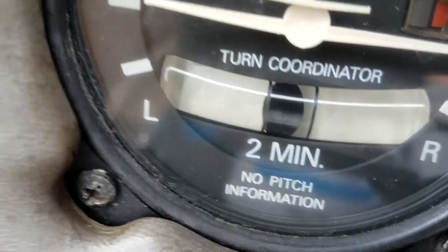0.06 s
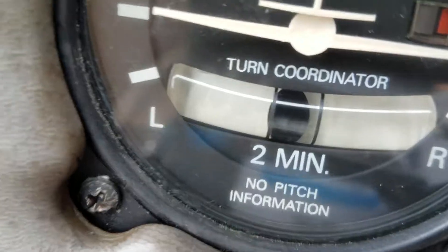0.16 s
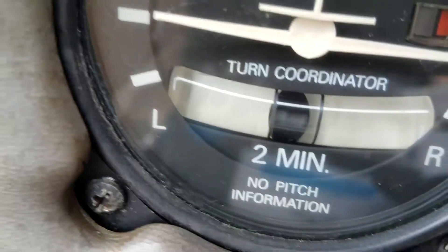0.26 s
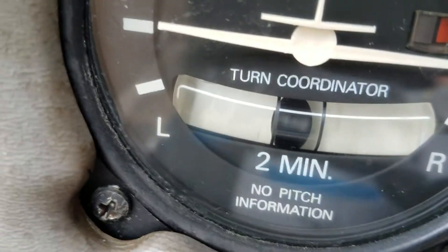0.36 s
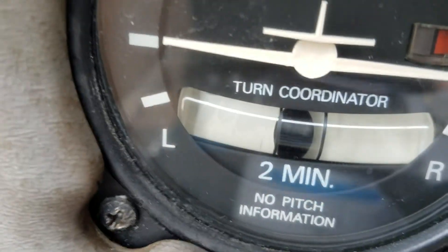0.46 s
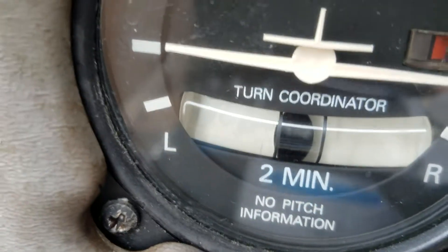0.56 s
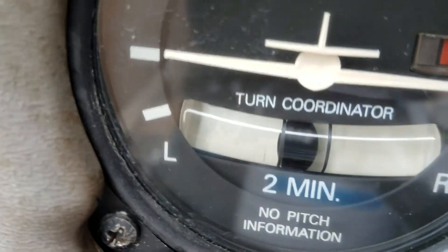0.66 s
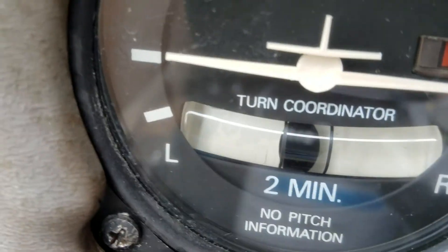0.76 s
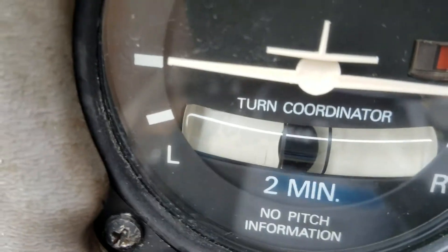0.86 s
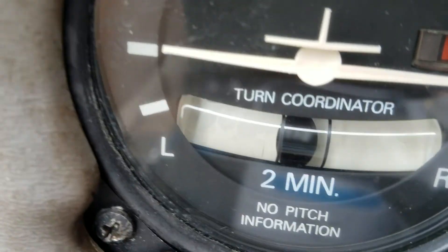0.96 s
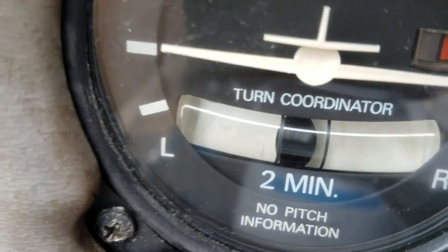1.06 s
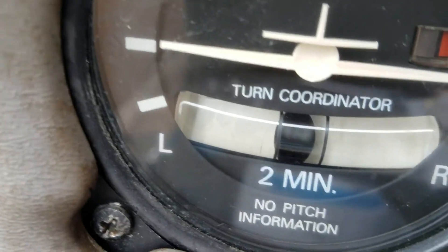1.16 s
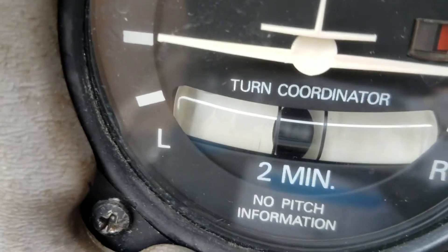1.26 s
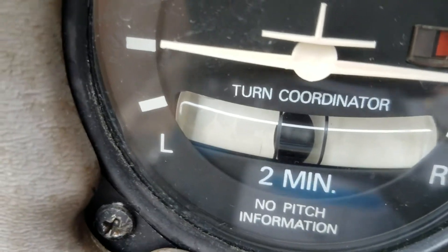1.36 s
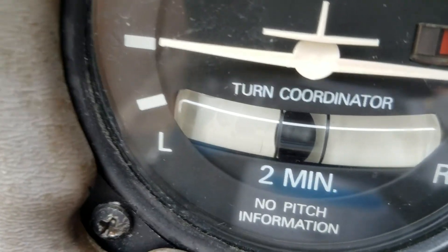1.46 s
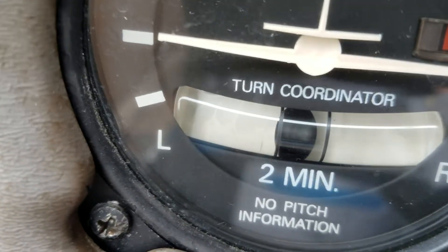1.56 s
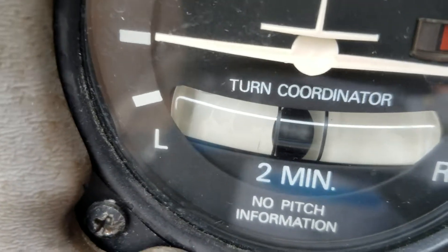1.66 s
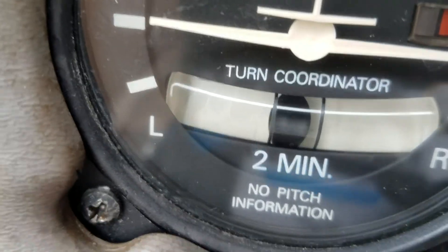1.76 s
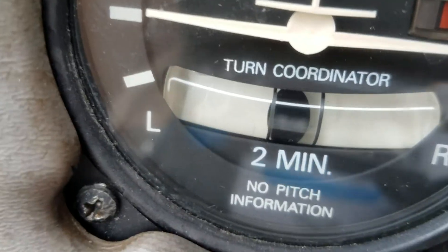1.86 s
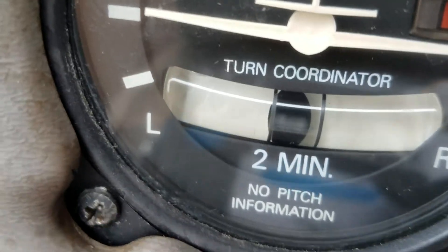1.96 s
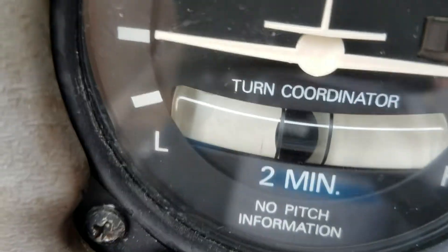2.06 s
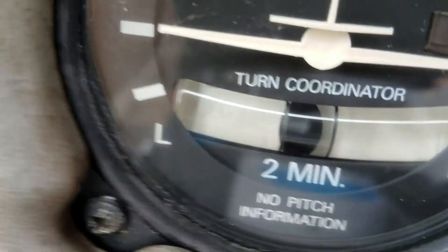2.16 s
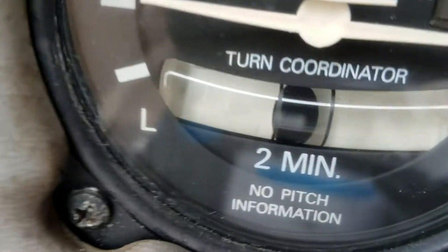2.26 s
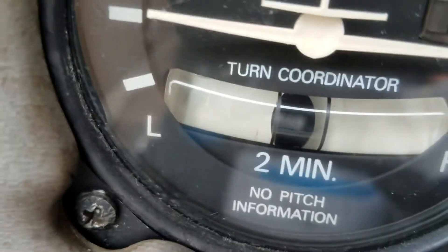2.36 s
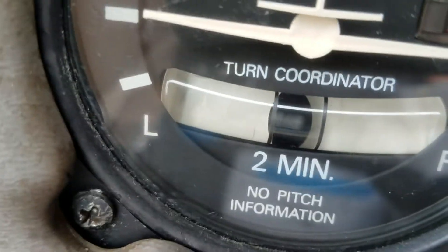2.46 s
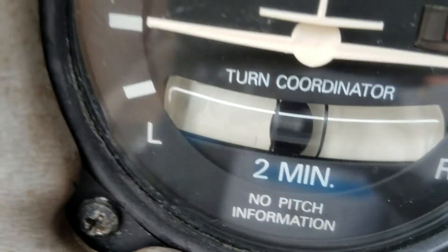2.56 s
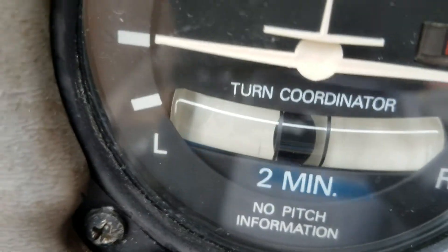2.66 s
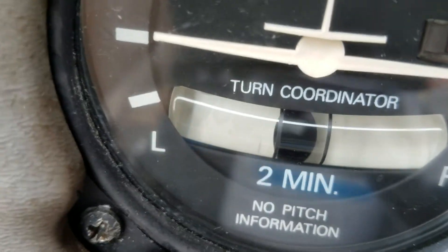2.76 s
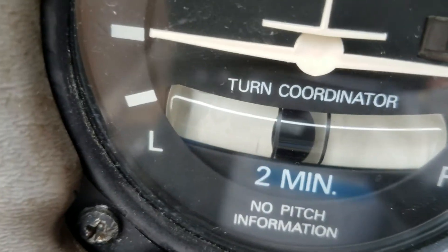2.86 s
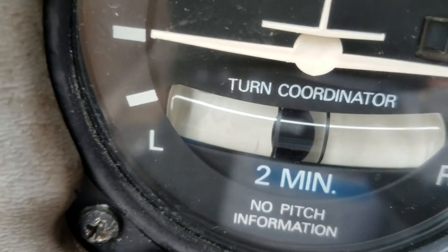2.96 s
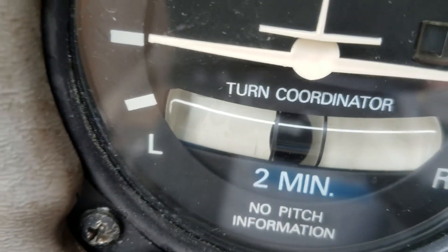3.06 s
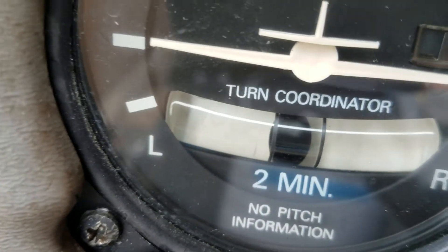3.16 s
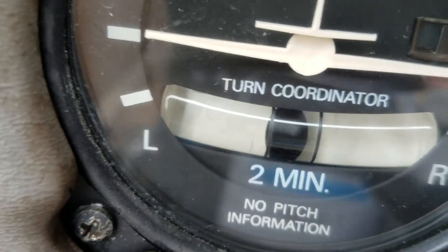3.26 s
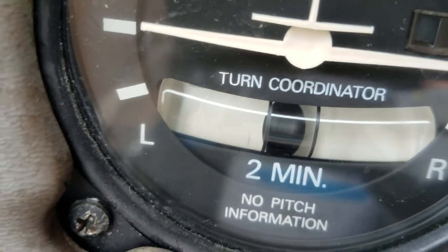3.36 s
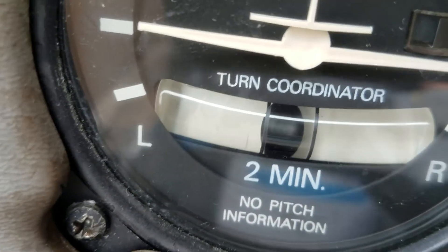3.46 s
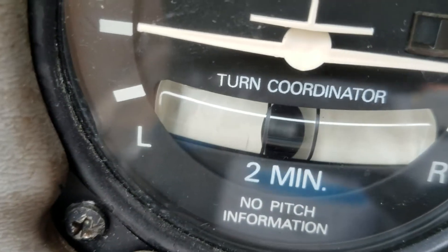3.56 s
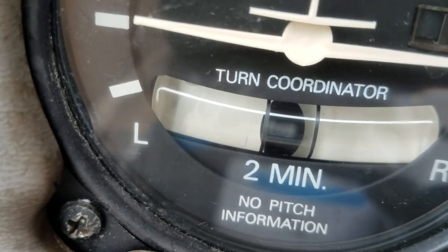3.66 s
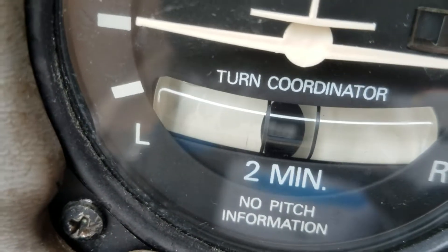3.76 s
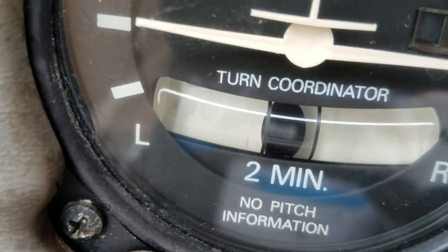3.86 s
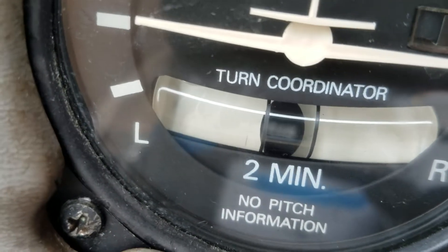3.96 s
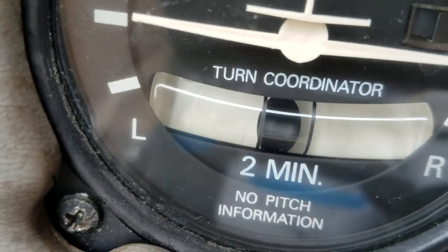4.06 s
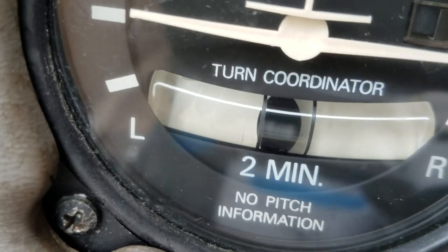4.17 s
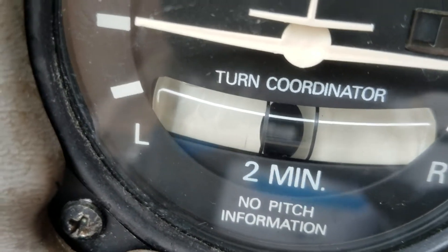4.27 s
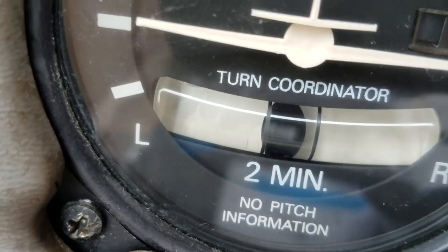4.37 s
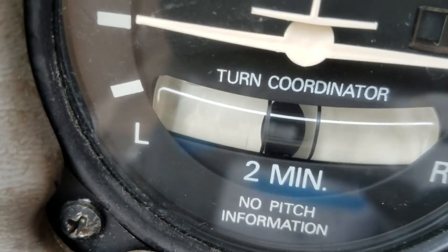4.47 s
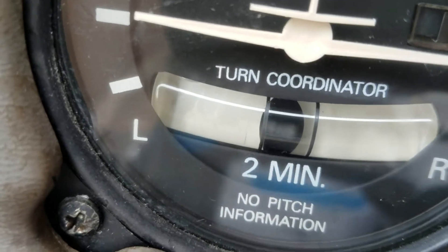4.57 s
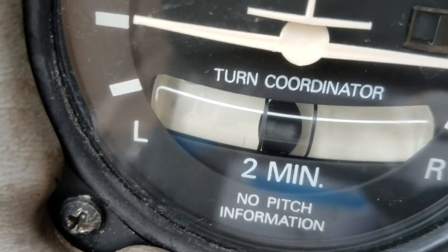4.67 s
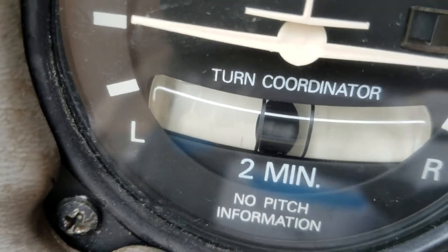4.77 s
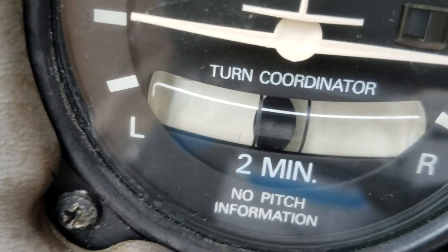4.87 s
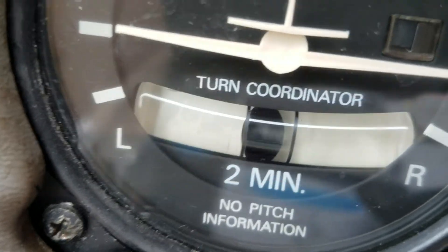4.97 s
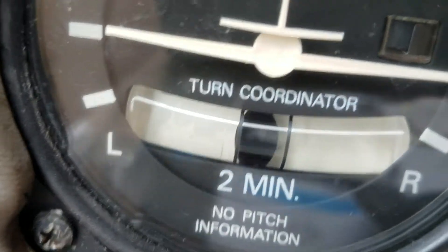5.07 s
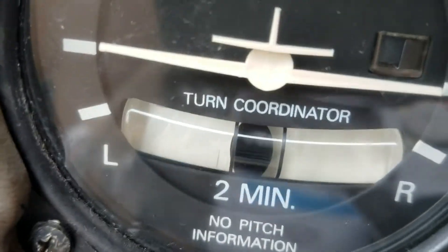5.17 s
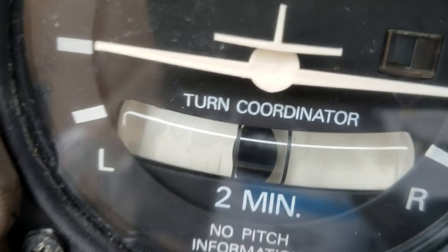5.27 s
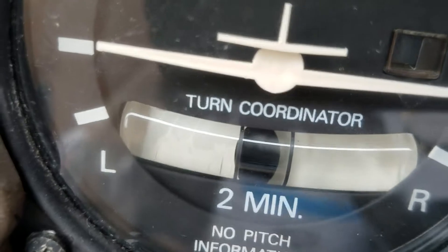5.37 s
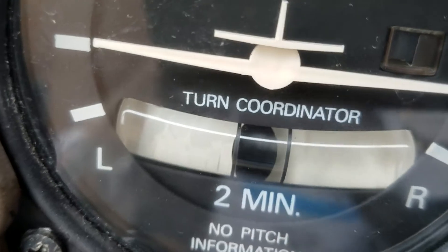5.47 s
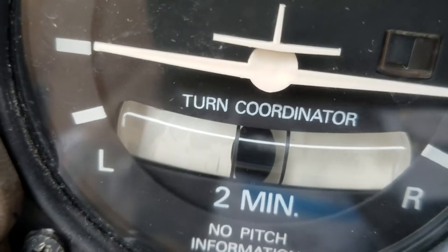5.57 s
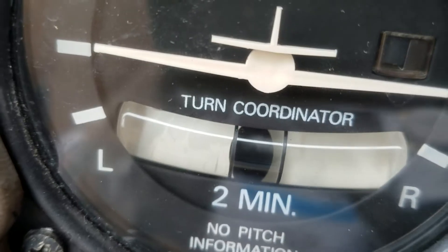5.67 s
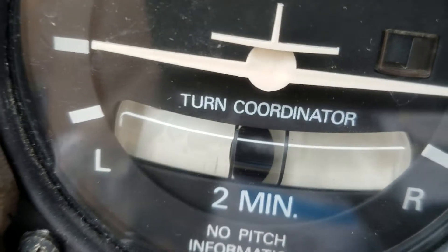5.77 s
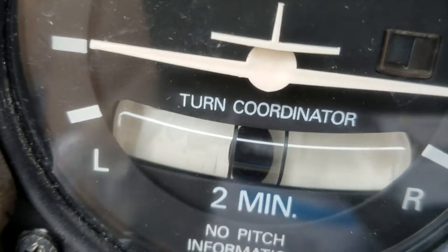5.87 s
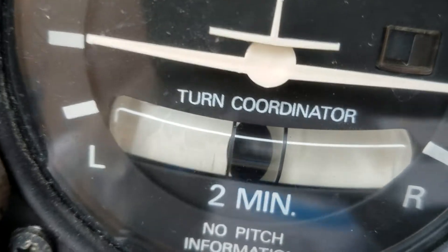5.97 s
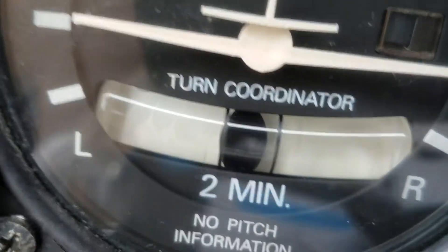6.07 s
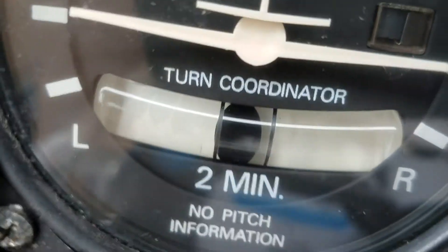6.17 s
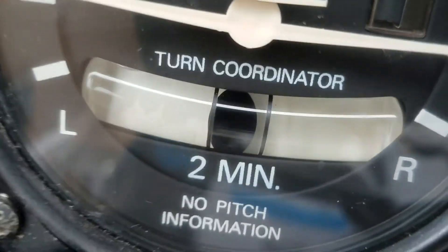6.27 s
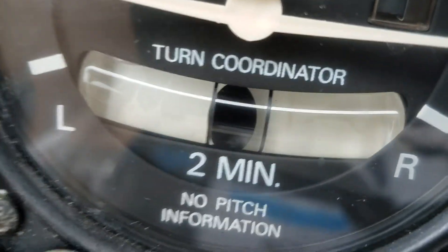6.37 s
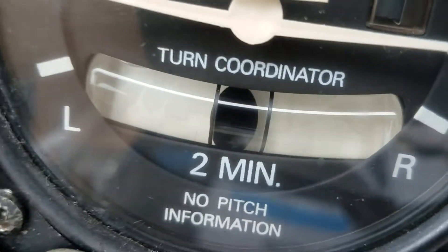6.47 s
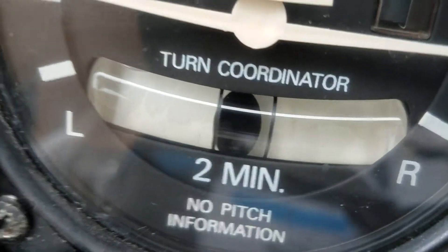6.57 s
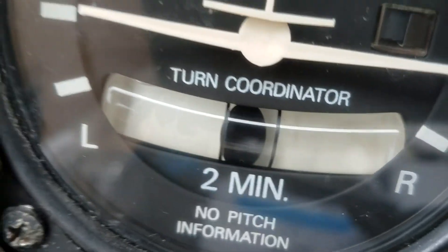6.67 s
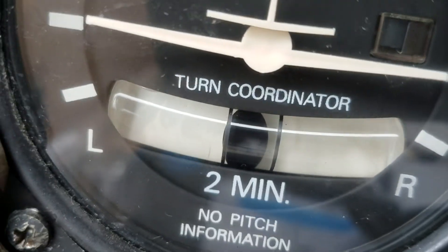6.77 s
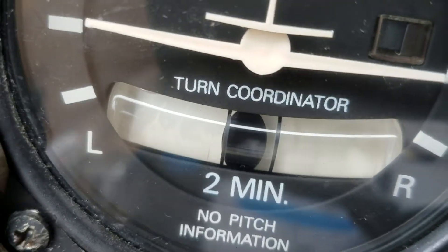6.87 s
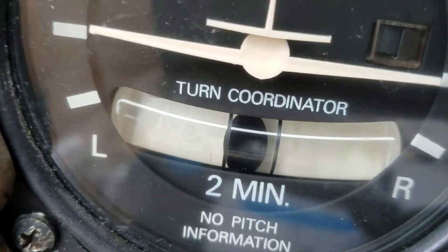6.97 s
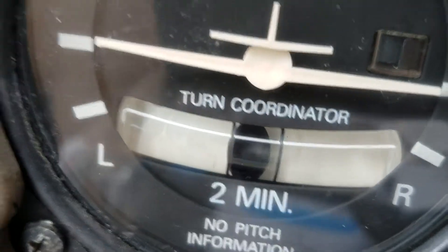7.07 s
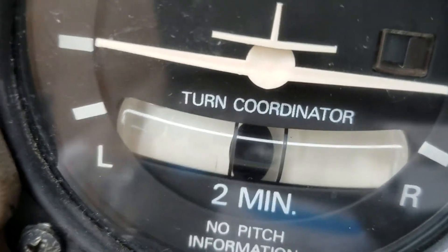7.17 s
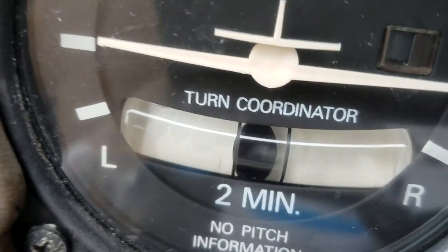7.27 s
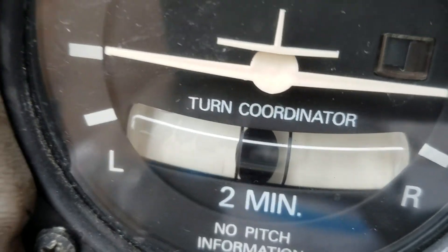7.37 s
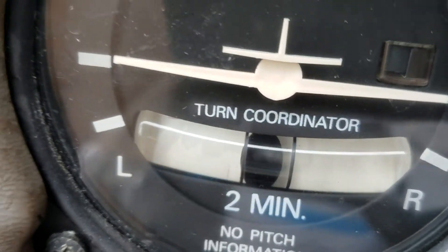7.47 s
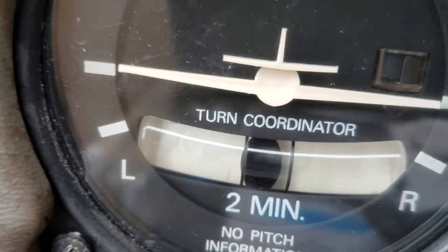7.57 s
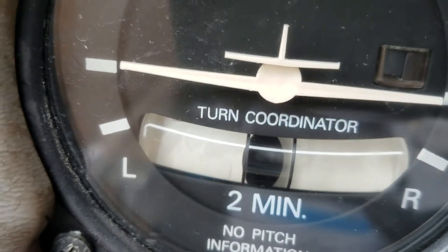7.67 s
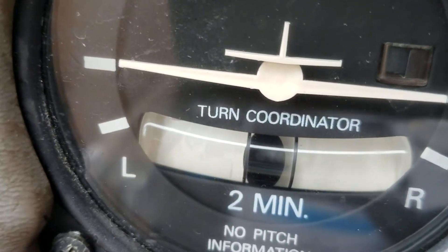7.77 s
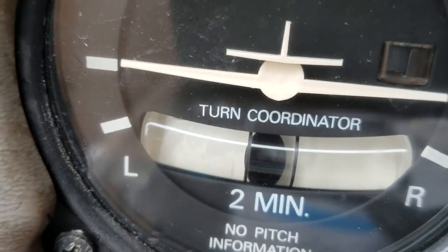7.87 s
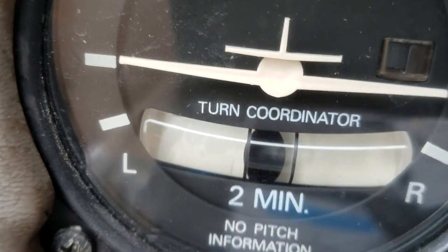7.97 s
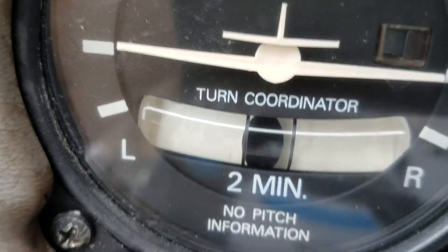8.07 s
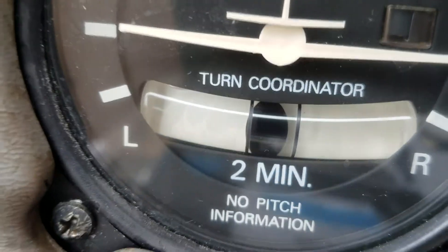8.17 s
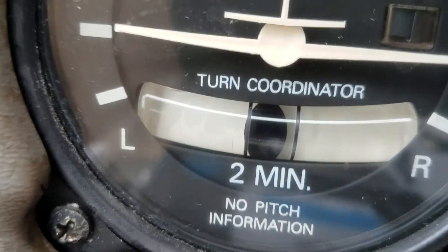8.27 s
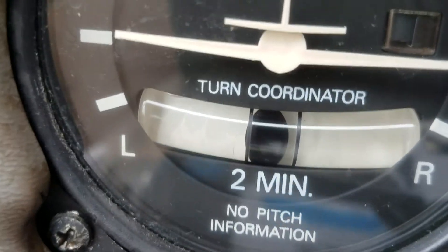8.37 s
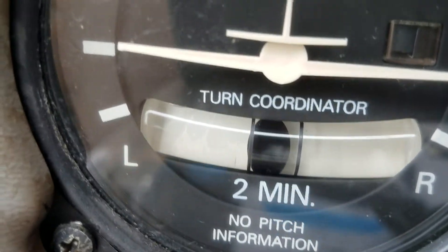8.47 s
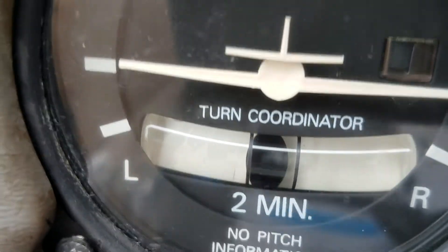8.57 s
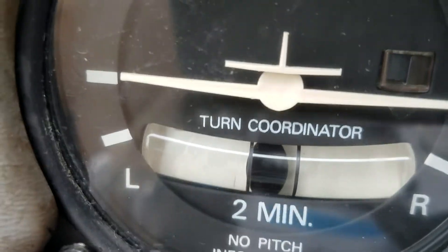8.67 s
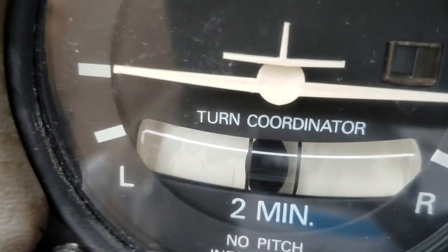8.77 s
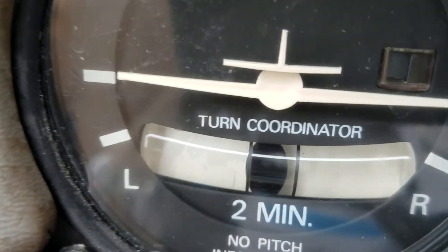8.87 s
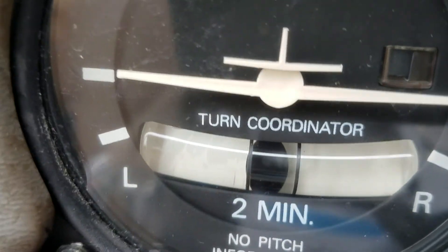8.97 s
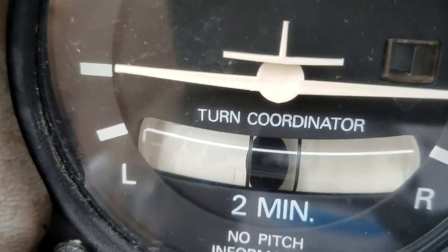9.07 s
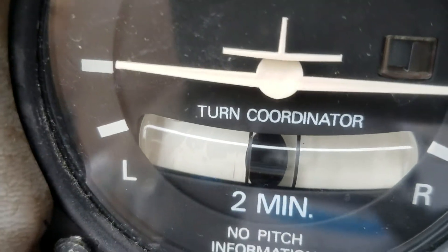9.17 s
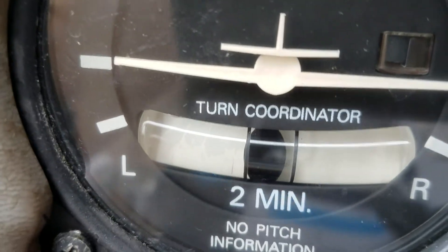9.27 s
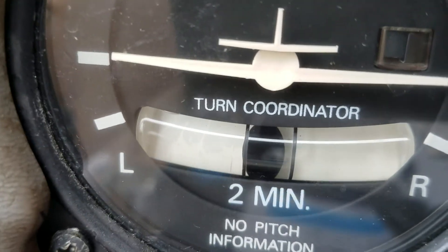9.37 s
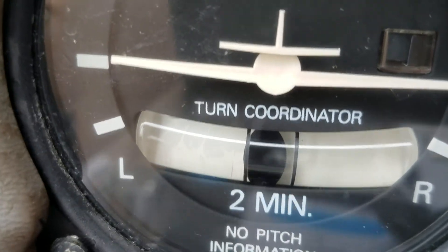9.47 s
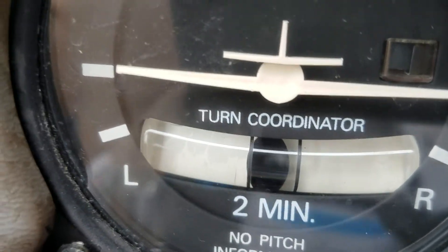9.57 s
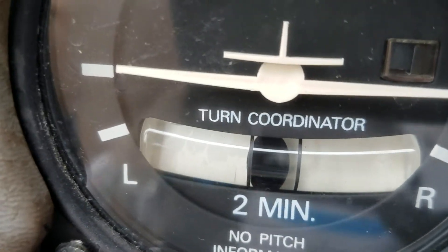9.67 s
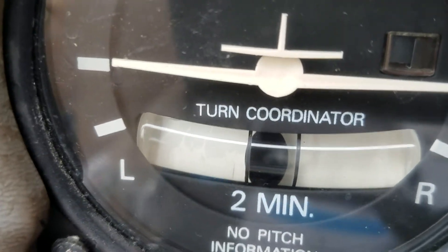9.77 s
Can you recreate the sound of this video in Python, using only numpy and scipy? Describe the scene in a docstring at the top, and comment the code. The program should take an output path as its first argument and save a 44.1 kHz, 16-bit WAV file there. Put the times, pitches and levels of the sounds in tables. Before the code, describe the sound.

A quiet indoor space with faint air and low rumble, picked up by a close stereo microphone. A strong pop on the left at 0.1 s, a weak one on the right at 0.2 s and a very loud one on the right at 0.7 s, with a faint momentary hum. Dry ticks and small clicks around 1.1-1.25 s lead to a bright double switch snap at 1.35 s, with a short loose rattle. From about 1.45 s a small gyro rotor spins up, with more ticks and soft bumps until 2.4 s. Bearing hiss and many parallel whines rise fast, then progressively slower, sweeping through metallic case resonances. Dull bumps fall at 4.8 and 7.9 s; the tones steady slightly near 5.3 s. Around 6 s the sound turns closer and brighter, then draws back by 7.6 s. A low unbalance hum swells towards the end at about 9.8 s, the whine still creeping upward.

```python
"""Aircraft gyro running up, close by

A quiet room, a two-port microphone close to the electric gyro of an aircraft turn instrument. After a few pops
the switch snaps and the rotor gathers speed. Its ball bearings hiss and sound many rising tones, which sweep
through the fixed resonances of the case, while the hum of the rotor's unbalance grows underneath."""
import sys
import numpy as np
from scipy import signal
from scipy.fft import rfft, irfft, next_fast_len
from scipy.io import wavfile
from scipy.ndimage import map_coordinates

SR = 44100
rng = np.random.default_rng(int(sys.argv[2]) if len(sys.argv) > 2 else 0)


def to_wav(sig):
    """Store sig (one row per channel, or 1-D mono) as 16-bit WAV at the path in sys.argv[1].

    Samples outside -1..1 are clipped; the rate is SR.
    """
    pcm = np.clip(np.atleast_2d(sig), -1, 1) * 32767
    pcm = np.round(pcm).astype(np.int16)
    wavfile.write(sys.argv[1], SR, pcm.T)  # frames by channels


N = 433944

# Air of the room. Each row: frequency in Hz, relative density in dB per Hz.
ROOM_AIR = [(120, -22), (200, 1), (1000, -3.5), (3100, -8), (4500, -14.5), (8300, -8.5), (10500, -20),
            (13000, -9), (16000, -37)]
# Low rumble at the microphone. Each row: frequency in Hz, relative density in dB per Hz.
RUMBLE_COLOUR = [(15, -18), (40, -2.5), (70, 3.5), (120, -1), (200, -4), (350, -10.5), (700, -44.5)]
# Levels of the rumble: its constant floor, and the mount once it shakes.
FLOOR_DB, MOUNT_DB = -69.5, -56.5
# The mount starts to shake around this rotor speed, over this width, both in turns per s.
SHAKE_SPEED, SHAKE_WIDTH = 59, 6.6
# Spells of handling rumble. Each row: start in seconds, start of the fade in seconds, level in dB.
HANDLING = [(0.215, .68, -62), (8.958, 9.256, -62)]
HANDLING_ATTACK_S, HANDLING_RELEASE_S = 0.16, 0.36
# A brief treble hiss early in the run-up: start, start of the fade, attack and release in seconds; level.
HISS_SPAN, HISS_DB = (1.81, 2.3, 0.28, 0.28), -46
# Its colour. Each row: frequency in Hz, relative density in dB per Hz.
HISS_COLOUR = [(5000, -31), (9000, -13), (12000, -23), (15500, -17)]
# A faint short hum: start, start of the fade, attack and release in seconds; level.
HUM_SPAN, HUM_DB = (0.69, 0.82, 0.031, 0.1), -62.5
# Its two tones. Each row: frequency in Hz, relative level in dB.
HUM_TONES = [(188.4, -3), (376.8, -2)]
# How the room dies away. Each row: frequency in Hz, time to fall 60 dB in seconds.
ROOM_DECAY = [(150, 1), (700, 0.46), (2500, 0.17), (6000, 0.29), (8500, 0.24)]

# Electrical pops on one side each. Each row: time in seconds, peak in dB, channel (0 left, 1 right).
POPS = [(.061, -7.5, 0), (.198, -26.5, 1), (.6833, -2.5, 1)]
# Soft bumps against the case. Each row: time in seconds, level in dB.
BUMPS = [(2.008, -34), (2.06, -37), (4.79, -31), (7.875, -28)]
# The dull ring of a bump. Each row: frequency in Hz, relative level in dB, time to fall 60 dB in seconds.
THUD_MODES = [(158, -7, 0.026), (300, 2.5, 0.021), (458, 5, 0.017)]
# Dry, full-band ticks. Each row: time in seconds, crack in dB, body in dB, first pitch of the body in Hz,
# left minus right in dB.
TICKS = [(1.1832, -15, -23, 1100, -2), (1.636, -32, -35, 1050, -8), (2.408, -18.5, -28.5, 750, -4)]
TICK_CRACK_T60_S = .003
# The body of a tick falls in pitch: last pitch in Hz, glide time constant in s, time to fall 60 dB in s.
TICK_RING = (300, 0.00366, 0.014)
# Clicks of the switch and the case. Each row: time in seconds, snap in dB, time for the snap to fall 60 dB
# in seconds, body in dB, left minus right in dB.
CLICKS = [(1.126, -52, 0.063, -58.5, -6), (1.232, -49, 0.035, -76, -9), (1.24, -35, 0.035, -66, -1),
          (1.348, -13, .042, -40, -2), (1.3517, -7, .026, -24, -3), (1.362, -41, 0.087, -38, 7),
          (1.781, -40, 0.032, -38, -4.5)]
# Colour of a snap. Each row: frequency in Hz, relative density in dB per Hz.
SNAP_COLOUR = [(200, -32), (450, -19), (900, -12), (1500, -8), (3000, -4), (3800, -11), (6500, -16),
               (7700, -6), (8500, 2), (9500, 0), (10500, -11), (15500, -16)]
# Body ring under a click. Each row: frequency in Hz, relative level in dB, time to fall 60 dB in seconds.
CLICK_BODY = [(600, -8, 0.04), (1000, 2, 0.0086), (2190, 2, .02)]
# Loose parts chatter after the snap: start and length in seconds, first level and fall over that length
# in dB, middle pitch in Hz, cycles of ring before it has fallen 60 dB.
RATTLE = (1.357, .13, -32, 25, 480, 5)

# The rotor: start, the speed it tends towards in turns per s, time constant of the run-up.
START_S, FULL_SPEED, RUN_UP_S = 1.437, 272.18, 7.912
# The balls run loose at first: time they settle and duration of that in seconds, share of speed lost until then.
SETTLE = (5.2, .3, .004)
# Change of the tones while they run loose. Each row: multiple of the rotor speed, change in dB.
WHILE_LOOSE = [(2.7, 4), (3.3, 5), (3.8, -6), (4.3, 1), (5.8, -1), (7.1, 5), (7.6, -2), (8, -7), (9.45, 1),
               (9.95, -7), (10.9, 3)]
# The twice-a-turn shake rings the mount: frequency in Hz, width in Hz, strength in dB.
MOUNT_RING = (186, 23, 1.3)

# Rates in the front and rear bearing per rotor turn: spin of the balls, balls passing a point of the race.
BALL_SPIN, BALL_PASS = (2.674, 2.688), (3.319, 3.305)
# Tones of the ball spin. Each row: overtone of the rate, sideband in rotor speeds, front bearing in dB,
# rear bearing in dB where it joins in.
SPIN_TONES = [(1, 0, -21.0), (1, 1, -28.5), (1, 1.5, -28.0), (1, 2.5, -29.0), (2, 0, -25.0, -31.0),
              (2, 1, -29.0), (3, 0, -20.5, -30.0), (3, 1, -26.5), (4, 0, -22.5, -35.5),
              (5, 0, -25.5, -23.5), (6, 0, -26.0, -27.5), (7, 0, -24.5, -31.0), (8, 0, -31.0, -26.0),
              (10, 0, -31.0, -26.5), (11, 0, -36.5, -25.0)]
# Tones of the balls passing. Each row: overtone of the rate, sideband in rotor speeds, front bearing in dB,
# rear bearing in dB where it joins in.
PASS_TONES = [(1, -1.0, -22.5), (1, -0.5, -26.0), (1, 0.0, -21.0), (1, 0.5, -22.5), (1, 1.0, -26.0),
              (1, 2.0, -28.0), (1, 2.5, -28.0), (2, -1.0, -26.5), (2, -0.5, -24.0), (2, 0.0, -21.0),
              (2, 0.5, -21.0), (2, 1.0, -22.5), (2, 1.5, -25.5), (2, 2.0, -27.5), (2, 2.5, -28.5),
              (3, -1.0, -26.0), (3, -0.5, -28.0), (3, 0.0, -21.5, -20.5), (3, 1.0, -29.5, -28.0),
              (4, -0.5, -33.0, -29.5), (4, 0.0, -26.0, -24.0), (4, 0.5, -30.0, -30.0),
              (4, 1.0, -34.5, -32.5), (5, -0.5, -34.5, -25.5), (5, 0.0, -28.5, -27.5),
              (5, 0.5, -21.0, -29.5), (6, -1.0, -34.0, -30.5), (6, -0.5, -31.0, -28.5),
              (6, 0.0, -35.0, -26.5), (6, 0.5, -24.5, -31.0), (7, -0.5, -34.5, -26.0),
              (7, 0.5, -26.5, -32.5), (8, -0.5, -31.5, -24.0), (9, -0.5, -37.0, -24.0)]
# A whirl at half the rotor speed. Each row: overtone, relative level in dB.
WHIRL_TONES = [(3, -27), (5, -19), (6, -27.5), (7, -14), (8, -27.5), (10, -27), (11, -28), (13, -33),
               (33, -26)]
# Lone high whines. Each row: multiple of the rotor speed, relative level in dB.
WHINES = [(24.39, -30), (37.77, -29), (47.58, -29), (49.92, -26), (50.84, -26.5)]
# Speed from which a tone is full, later for higher ones: base, addition per multiple, limit, in turns per s.
FULL_FROM = (10, 7.8, 115)
# The mount favours tones in the low middle. Each row: frequency in Hz, gain in dB.
MOUNT_LIFT = [(420, 0), (520, 2.5), (720, 2.5), (880, -.5), (1200, 0)]
# Rolling noise thins as bumps on the races pass faster. Each row: frequency in Hz, gain at speed in dB.
THINNING = [(250, -4), (400, -9), (900, -9), (1300, -3), (2200, -3), (3500, -.5)]
THIN_FROM, THIN_BY = 36, 70  # turns per s
# Bands of the bearing sound, from low to high: growl, whirr, ring, sizzle. Each row: knee in turns per s,
# level at the knee in dB, dB per doubling of speed below the knee, dB per doubling above it.
ROLLING_BANDS = [(28.4, -43, 6, 0.92), (42, -41.5, 8, 0), (70, -39.5, 8, 1), (153.4, -31.5, 8.5, -3.5)]
# The instrument case. Each row: resonance in Hz, width in Hz, relative strength left in dB and right in dB,
# phase lead of the left port in radians.
CASE = [(243, 20, -25, -31, 0), (350.6, 11.4, -20.5, -27.5, 1.1), (487, 13.5, -19, -24, 0.66),
        (674.6, 87, -11, -14.5, 1.0), (775, 17.6, -9, -9.5, 1.5), (928, 93, -17, -12, 1.53),
        (1106, 83, -20, -18, -2), (1341.5, 74, -8.5, -1, 1.02), (1544, 138, -14.5, -7, 1.5),
        (1857, 57, -14, -7, -2), (2133, 91, -14, -3, -2), (2244, 95, 0, -8.5, -1.9),
        (2816, 126, -9, -11, 1.6), (3005, 76, -12, -7, 1.0), (3427, 153, -5.5, -7, 2.0),
        (3695, 54, -23, -5, -2), (4100, 130, -4.5, -38, 2.5), (4306, 153, -4.5, 2, 1.33),
        (4867, 203, -5, -28.5, 4), (5294, 246, -27.5, -14.5, 1), (5986, 180, -12, -11.5, 0.72),
        (6420, 1070, -15, -43.5, 4), (7810, 390, -9.5, -8.5, -1), (8256, 237, -8, 6, 2),
        (8860, 270, -5, -30, 5), (9390, 180, -13, -3, 3.5), (9810, 130, 0, -0.5, -2),
        (10320, 214, -10, -10.5, 5), (12470, 120, -17.5, -20, -2), (14300, 410, -20, -25, -2)]
# The microphone leans in to the glass and draws back: start, start of the fade, attack and release in seconds.
LEAN = (5.64, 6.4, 0.4, 1.2)
# Colour close to the glass. Each row: frequency in Hz, gain in dB.
CLOSE_COLOUR = [(3000, -0.5), (4050, -5.5), (4450, -2), (5000, 4.5), (5800, 1), (8400, 0), (9900, 4),
                (12000, -3)]
# The microphone drifts sideways. Each row: time in seconds, treble left minus right in dB.
DRIFT = [(5.6, -2.5), (6.25, 1), (7.75, -3), (8.3, -0.5), (9.84, -1)]
TOP_HZ = 15900  # band limit of the recorder


def amp(db):
    """Decibels to gain."""
    return 10 ** (np.asarray(db) / 20)


def unit(x):
    """Scaled to rms 1."""
    return x / np.sqrt(np.mean(x ** 2) + 1e-20)


def sides(left_minus_right_db):
    """Gains of the left and right channel for a level difference."""
    return amp([[left_minus_right_db / 2], [-left_minus_right_db / 2]])


def along(points, hz):
    """(Hz, value) points read on a log axis."""
    point_hz, value = np.transpose(points)
    return np.interp(np.log(hz + 1), np.log(point_hz + 1), value)


def curves(rows):
    """One value per sample for each column after the time."""
    times, *columns = np.transpose(rows)
    return [np.interp(np.arange(N) / SR, times, column) for column in columns]


def swell(start, fade_start, attack, release):
    """A gain that rises from start, holds, and fades from fade_start; all in seconds."""
    t = np.arange(N) / SR
    return np.clip((t - start) / attack, 0, 1) * np.clip(1 - (t - fade_start) / release, 0, 1)


def wobble(rate):
    """A smooth random curve, rate knots a second."""
    knots = rng.standard_normal(int(N * rate / SR) + 4)
    coarse = np.arange(0, N, 64)
    return np.interp(np.arange(N), coarse, map_coordinates(knots, [coarse * rate / SR]))


def filtered(x, response):
    """x passed through a complex response of frequency."""
    size = next_fast_len(N + SR // 4)
    spectrum = rfft(x, size) * response(np.fft.rfftfreq(size, 1 / SR))
    return irfft(spectrum, size)[..., :N]


def coloured(x, points):
    """x with the (Hz, dB) points as its gain."""
    return filtered(x, lambda hz: amp(along(points, hz)))


def noise(colour, alike):
    """Stereo noise of rms 1; alike is the share of power common to both sides."""
    common, left, right = rng.standard_normal((3, N))
    share = np.clip(alike, 0, 1)
    pair = np.sqrt(share) * common + np.sqrt(1 - share) * np.array([left, right])
    return unit(coloured(pair, colour))


def ringing(modes, t):
    """Damped modes of alternating sign, struck a little differently each time."""
    ring = 0
    for k, (hz, db, t60) in enumerate(modes):
        fading = amp(db + rng.normal(0, 2) - 60 * t / t60)
        ring = ring + (-1) ** k * fading * np.sin(2 * np.pi * hz * rng.normal(1, 0.043) * t)
    return ring


def background(speed):
    """Room air and a brief hiss, over a low rumble from a floor, handling and the shaking mount."""
    opening_db = np.interp(np.arange(N) / SR, [0, .3], [-7, 0])  # the air fades in at first
    air = amp(-67.0 + opening_db) * noise(ROOM_AIR, alike=0.11)
    shaking = (1 + np.tanh((speed - SHAKE_SPEED) / SHAKE_WIDTH)) / 2
    handling = sum(amp(db) * swell(start, fade_start, HANDLING_ATTACK_S, HANDLING_RELEASE_S)
                   for start, fade_start, db in HANDLING)
    # the three causes add by power
    strength = np.linalg.norm([amp(FLOOR_DB + opening_db), handling, amp(MOUNT_DB) * shaking], axis=0)
    rumble = strength * amp(wobble(5.9)) * noise(RUMBLE_COLOUR, alike=0.77)
    hiss = amp(HISS_DB) * swell(*HISS_SPAN) ** 2 * noise(HISS_COLOUR, alike=0.13)
    return air + rumble + hiss


def hum():
    """A faint hum of two steady tones that lasts a moment."""
    t = np.arange(N) / SR
    tones = sum(amp(db) * np.sin(2 * np.pi * hz * t) for hz, db in HUM_TONES)
    return amp(HUM_DB) * swell(*HUM_SPAN) * tones


def room(x):
    """A small room: noise tails in which each frequency dies at its own speed."""
    hz, t, z = signal.stft(rng.standard_normal((2, SR // 2)), SR, nperseg=256)
    fading = amp(-60 * t / along(ROOM_DECAY, hz)[:, None])
    tail = signal.istft(z * fading, SR, nperseg=256)[1]
    return signal.fftconvolve(x, tail / np.linalg.norm(tail[0]), axes=1)[:, :N]


def pops(sag, swing_hz, rise):
    """A voltage step on one channel sags back through a high-pass and undershoots; sag and rise in seconds."""
    out, t = np.zeros((2, N)), np.arange(SR // 20) / SR
    w = 2 * np.pi * swing_hz
    swing = np.cos(w * t) - np.sin(w * t) / (w * sag)
    pulse = np.exp(-t / sag) * swing * (1 - np.exp(-t / rise))
    for s, db, channel in POPS:
        out[int(channel), round(s * SR):][:len(t)] += amp(db) * pulse / pulse.max()
    return out


def bumps():
    """Soft contacts give a short, dull thud."""
    out, t = np.zeros(N), np.arange(SR // 4) / SR
    for s, db in BUMPS:
        soft_onset = 1 - np.exp(-t / 0.0035)
        out[round(s * SR):][:len(t)] += amp(db) * ringing(THUD_MODES, t) * soft_onset
    return out


def ticks():
    """Each tick is a very short white crack over a ring that falls in pitch, with no echo."""
    out, t = np.zeros((2, N)), np.arange(SR // 10) / SR
    last_hz, glide, t60 = TICK_RING
    for s, crack_db, body_db, first_hz, pan_db in TICKS:
        hz = last_hz + (first_hz - last_hz) * np.exp(-t / glide)
        ring = np.sin(2 * np.pi * np.cumsum(hz) / SR) * amp(body_db - 60 * t / t60)
        crack = rng.standard_normal((2, len(t))) * amp(crack_db - 60 * t / TICK_CRACK_T60_S)
        out[:, round(s * SR):][:, :len(t)] += (crack + ring) * sides(pan_db)
    return out


def clicks():
    """Each contact is a bright, chattering snap over a short ring of the body."""
    out, t = np.zeros((2, N)), np.arange(SR // 4) / SR
    grain = unit(noise(SNAP_COLOUR, alike=0.21) * amp(3 * wobble(300)))
    for s, snap_db, t60, body_db, pan_db in CLICKS:
        start = round(s * SR)
        snap = grain[:, start:start + len(t)] * amp(snap_db - 60 * t / t60)
        body = amp(body_db) * ringing(CLICK_BODY, t)
        out[:, start:start + len(t)] += (snap + body) * sides(pan_db)
    return out


def rattle(count=56):
    """Loose parts knock at uneven moments, each at its own pitch and force, on the whole ever more weakly."""
    out, t = np.zeros(N), np.arange(SR // 20) / SR
    start, length, first_db, fall_db, middle_hz, cycles = RATTLE
    for k, (late, pitch, force) in enumerate(rng.uniform(-0.45, 0.61, (count, 3))):
        age = (k + late) / count
        hz = middle_hz * 6 ** pitch
        fading = amp(first_db - fall_db * age + 10 * force - 60 * t * hz / cycles)
        onset = 1 - np.exp(-2 * hz * t)
        out[round((start + length * age) * SR):][:len(t)] += np.sin(2 * np.pi * hz * t) * fading * onset
    return out


def loose():
    """1 while the balls run loose, 0 once they have settled."""
    settle_s, duration_s, _ = SETTLE
    return np.clip(1 - (np.arange(N) / SR - settle_s) / duration_s, 0, 1)


def rotor():
    """Speed (turns per s) and angle (radians) of the rotor: it gains ever more slowly as the drag grows."""
    running_s = np.maximum(np.arange(N) / SR - START_S, 0)
    lost_share = SETTLE[2] * loose()
    speed = FULL_SPEED * (1 - np.exp(-running_s / RUN_UP_S)) * (1 - lost_share)
    return speed, 2 * np.pi * np.cumsum(speed) / SR


def unbalance(speed, angle, once_db, twice_db, steepness, left_db):
    """The rotor shakes its mount once and twice a turn, much harder near the highest speed it reaches."""
    share = speed / speed.max()
    once_growth = share ** steepness + amp(-6.0) * share ** 2
    once = amp(once_db + 0.3 * wobble(4.9)) * once_growth * np.sin(angle)
    ring_hz, width_hz, ring_db = MOUNT_RING
    ring = amp(ring_db) / (1 + ((2 * speed - ring_hz) / width_hz) ** 2)
    twice_growth = share ** (2 * steepness) + (amp(-5.5) + ring) * share
    twice = amp(twice_db + 2.1 * wobble(4.6)) * twice_growth * np.sin(2 * angle)
    return np.sqrt(2) * (once + twice) * sides(left_db)


def case_response(hz):
    """The resonances of the case, each reaching the two ports with its own strength and phase."""
    grid = np.linspace(0, SR / 2, 4096)
    centre, width, left_db, right_db, lead = np.transpose(CASE)
    shape = 1 / (1 + ((grid - centre[:, None]) / width[:, None]) ** 2) ** 2
    left_gain, right_gain = np.sqrt(amp([left_db, right_db]) ** 2 @ shape)
    # the phase between the ports follows the resonances that are strong in both
    shared = (amp(left_db + right_db) * np.exp(1j * lead)) @ shape ** 2
    phase = np.interp(hz, grid, np.unwrap(np.angle(shared)))
    return np.array([np.interp(hz, grid, left_gain) * np.exp(1j * phase), np.interp(hz, grid, right_gain)])


def series(rates, tones):
    """(multiple, dB) of the overtones and sidebands of both bearings."""
    return [(overtone * rate + sideband, db)
            for overtone, sideband, *levels in tones
            for rate, db in zip(rates, levels)]


def bearing_tones(angle, speed, flutter_db, wander, size=2 ** 18):
    """Ball spin, ball passing, whirl and whines along the rotor's angle; each swells and wanders as balls slip."""
    track = np.linspace(0, angle[-1], size)
    knots = np.linspace(0, angle[-1], 48)
    knot_speed, looseness = np.interp(knots, angle, speed), np.interp(knots, angle, loose())
    base, per_multiple, limit = FULL_FROM
    whirl = [(overtone / 2, db) for overtone, db in WHIRL_TONES]
    orders = series(BALL_SPIN, SPIN_TONES) + series(BALL_PASS, PASS_TONES) + whirl + WHINES
    tones = np.zeros(size)
    for multiple, db in orders:
        swells, slips = rng.standard_normal((2, len(knots)))
        grown = np.clip(knot_speed / min(base + per_multiple * multiple, limit), 0, 1) ** 2
        knot_phase = multiple * knots + wander * slips + rng.uniform(0, 2 * np.pi)
        phase = np.interp(track, knots, knot_phase)
        loose_db = looseness * np.interp(multiple, *np.transpose(WHILE_LOOSE))
        strength = grown * amp(db + flutter_db * swells + loose_db)
        tones += np.interp(track, knots, strength) * np.sin(phase.astype(np.float32))
    # read the track at the angle of each moment, so that all tones rise with the rotor
    whine = np.sqrt(2) * map_coordinates(tones, [angle / track[1]], order=5, mode="nearest")
    return coloured(whine, MOUNT_LIFT)


def race_pattern(angle, spread_db, count=18, size=2 ** 14):
    """Flaws of balls and races repeat after count turns: a dense comb of weak, uneven orders."""
    multiples = np.arange(size // 2 + 1) / count
    present = (multiples > 10) * (multiples < 100)
    strength = amp(spread_db * rng.uniform(-1, 1, len(multiples))) * present
    track = irfft(strength * np.exp(2j * np.pi * rng.random(len(multiples))))
    position = angle / (2 * np.pi) / count * size % size
    return unit(map_coordinates(track, [position], order=3, mode="grid-wrap"))


def rolling_noise(speed):
    """Tiny bumps on the races give a hiss, which thins in the low middle as they pass faster."""
    colour = [(200, -4.5), (500, 5.5), (1500, -3.0), (3000, -9.0), (16000, -1.0)]  # Hz, relative dB per Hz
    rolling = amp(2.0) * noise(colour, alike=0.62)
    thin = np.clip((speed - THIN_FROM) / (THIN_BY - THIN_FROM), 0, 1)
    return (1 - thin) * rolling + thin * coloured(rolling, THINNING)


def rolling_db(speed, knee, db, below, above):
    """Level of one band of the bearing sound at each rotor speed."""
    doublings = np.log2(np.maximum(speed, 1e-3) / knee)
    return db + below * np.minimum(doublings, 0) + above * np.maximum(doublings, 0)


def bearings(speed, angle):
    """Rolling noise and bearing tones ring the case; each band grows with speed by its own law."""
    up_to_speed = np.clip(speed / 95, 0, 1)
    tones = bearing_tones(angle, speed, flutter_db=1.8, wander=0.21)
    tones = tones + up_to_speed * amp(-7.5) * race_pattern(angle, spread_db=12)
    rolling = rolling_noise(speed)
    # the load on the balls pulses with each turn and flutters at random
    pulse_db = .5 * np.sin(angle) + 1.2 * np.sin(2 * angle)
    load = amp(pulse_db + 0.44 * wobble(45) + 0.42 * wobble(6.6))
    sound = filtered(load * (rolling + tones), case_response)
    closeness = swell(*LEAN)
    sound = (1 - closeness) * sound + closeness * coloured(sound, CLOSE_COLOUR)
    edges = [0, 1700, 3300, 7000, SR / 2]  # Hz
    sway = amp(np.outer([.5, -.5], curves(DRIFT)[0]))
    out = np.zeros((2, N))
    for lo, hi, law in zip(edges, edges[1:], ROLLING_BANDS):
        band = filtered(sound, lambda hz: (hz >= lo) & (hz < hi))
        band = band / np.std(band.mean(axis=0))
        out += amp(rolling_db(speed, *law)) * band * (sway if lo else 1)  # the lowest band stays put
    return out


def scene():
    """Room, switch and gyro together; only the clicks and the rattle echo in the room."""
    speed, angle = rotor()
    contacts = clicks() + rattle()
    gyro = bearings(speed, angle)
    gyro = gyro + unbalance(speed, angle, once_db=-50.0, twice_db=-57.0, steepness=9.7, left_db=9.0)
    handling = contacts + amp(-11.5) * room(contacts) + ticks() + bumps()
    electrical = pops(sag=0.0014, swing_hz=70, rise=.00005) + hum()
    return background(speed) + electrical + handling + gyro


def record(dry):
    """The recorder rounds off the loudest peaks and keeps next to nothing above its band limit."""
    rounded = dry / (1 + (np.abs(dry) / .78) ** 6) ** (1 / 6)
    return filtered(rounded, lambda hz: 1 / (1 + (hz / TOP_HZ) ** 120))


dry = scene()
out = record(dry)
to_wav(out)
```